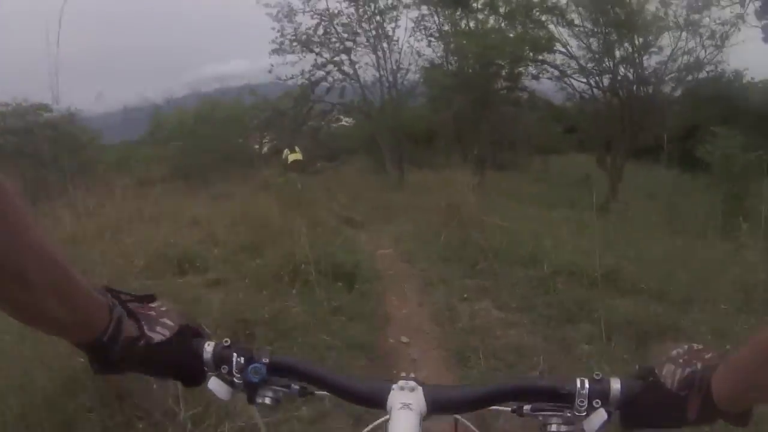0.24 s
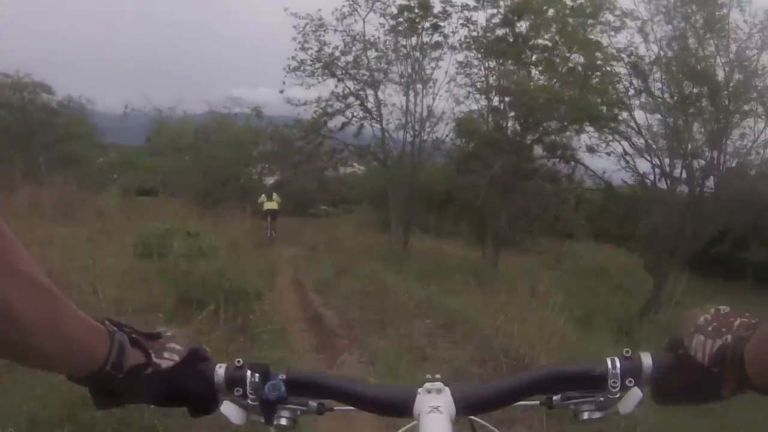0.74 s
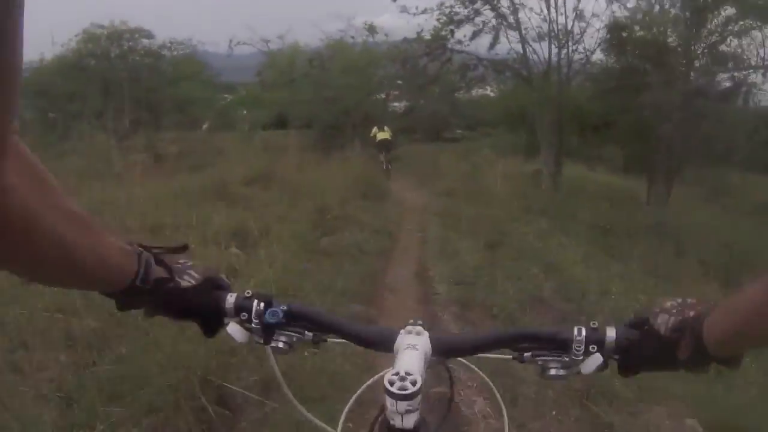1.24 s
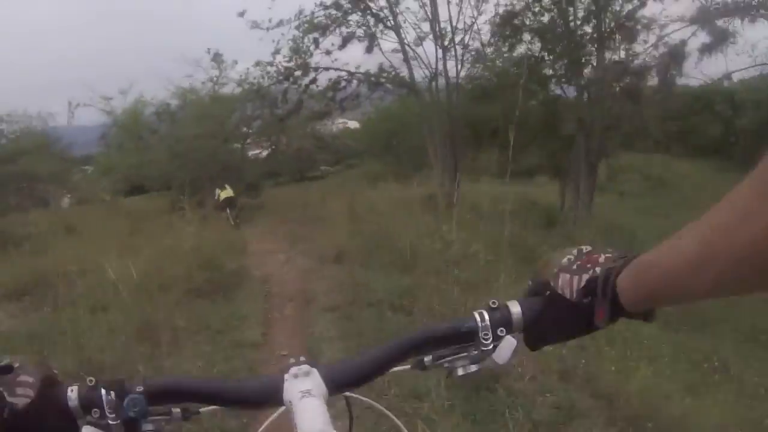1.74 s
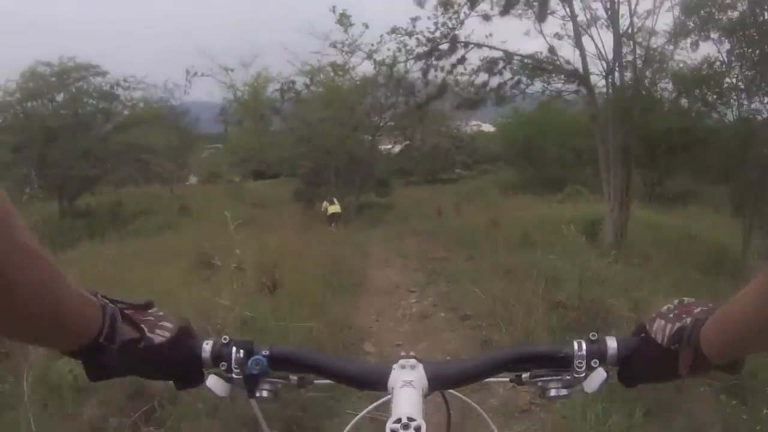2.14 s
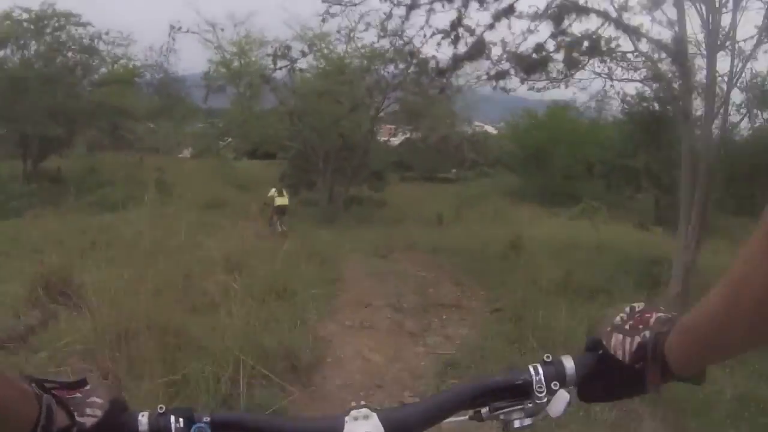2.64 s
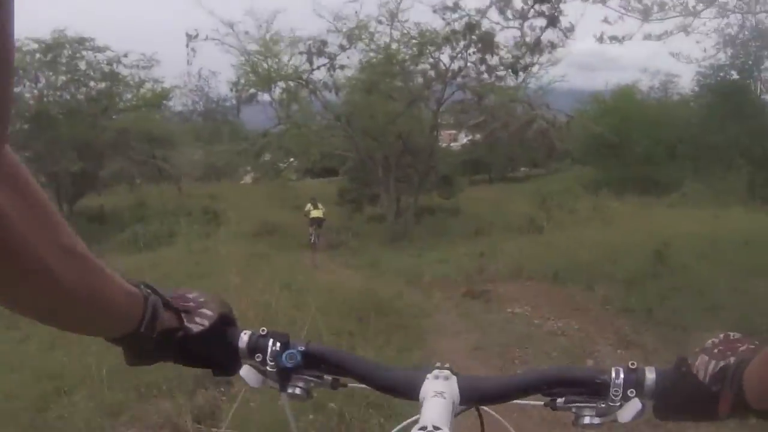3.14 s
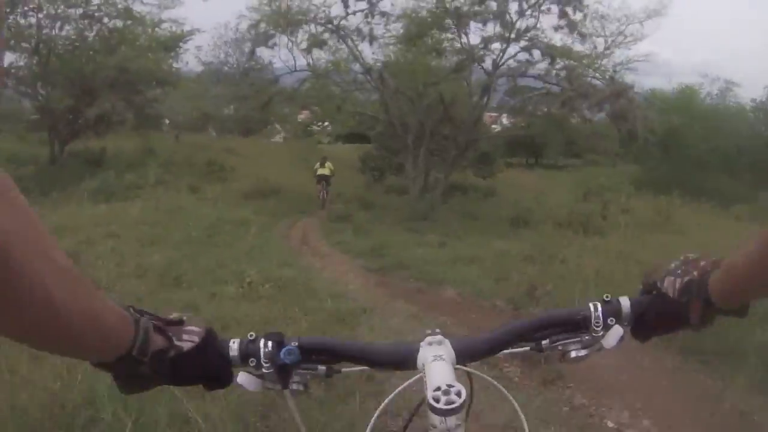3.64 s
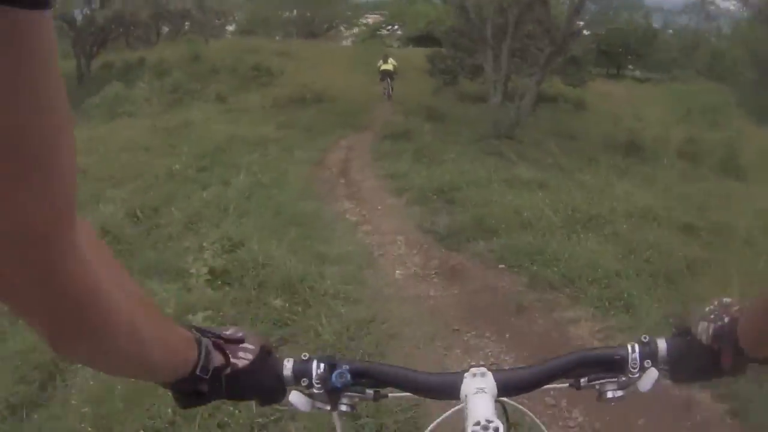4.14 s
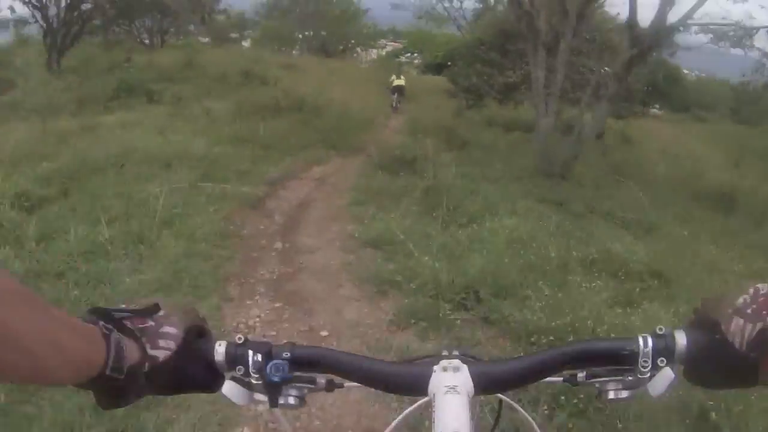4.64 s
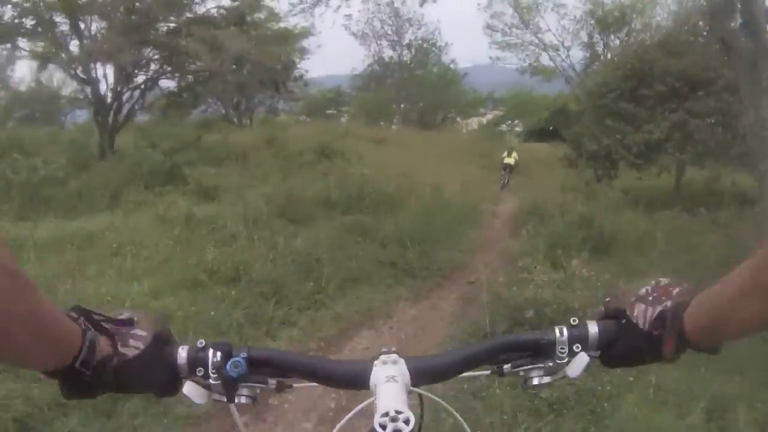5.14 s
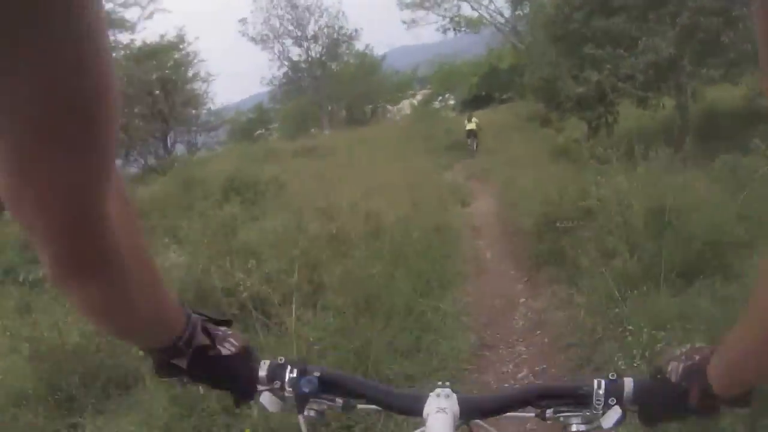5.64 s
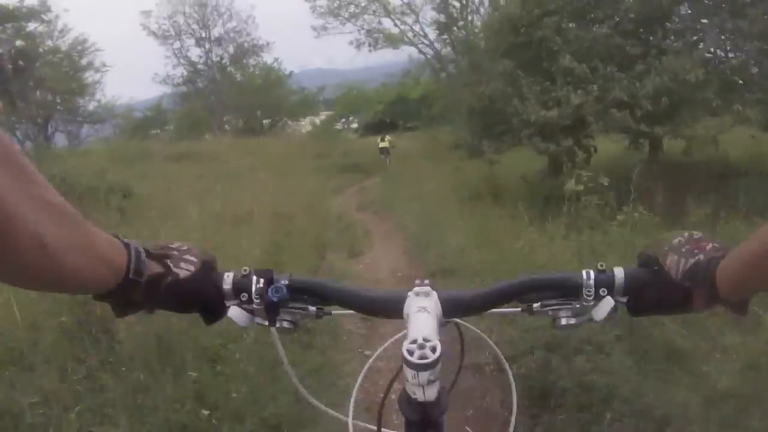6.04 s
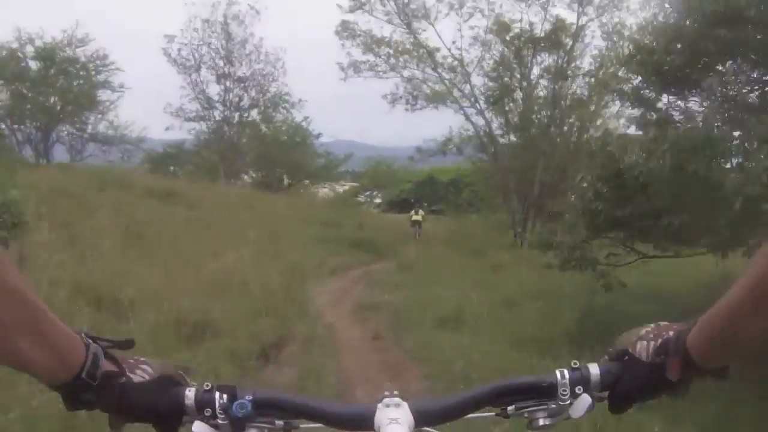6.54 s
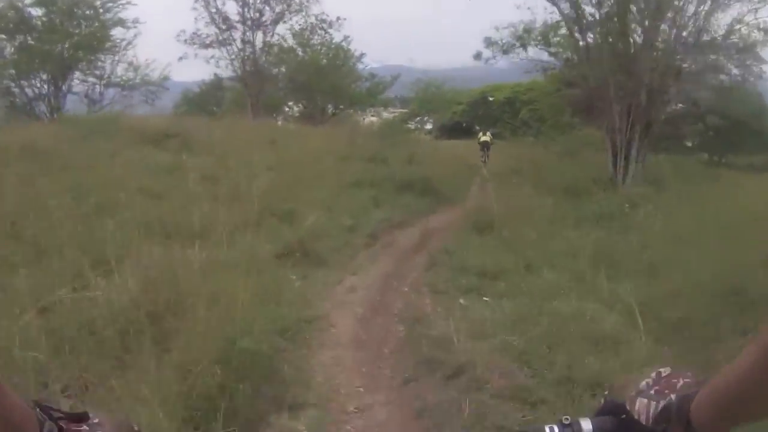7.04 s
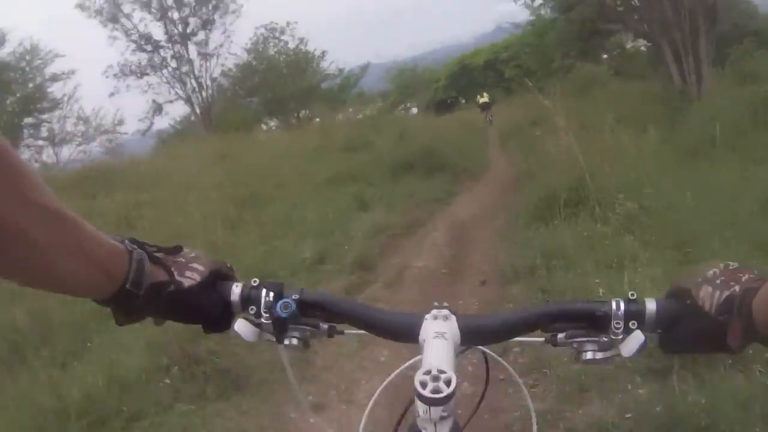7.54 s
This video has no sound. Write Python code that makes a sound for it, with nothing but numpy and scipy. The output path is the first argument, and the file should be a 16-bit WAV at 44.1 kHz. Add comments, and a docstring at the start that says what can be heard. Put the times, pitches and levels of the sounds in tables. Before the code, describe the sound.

Continuous rough riding on dirt and gravel, muffled and boxy, very close. The rider's body sways and bumps the plastic-cased microphone with very low heaves and damped thuds, while the case knocks in hollow mid tones. Fine tyre grit crunches and small parts tick. Tiny high chirps and a short scrape come early, hard knocks at 1.5 and 5.7 seconds, and metallic chain slaps ring later.

```python
"""A mountain bike on a bumpy dirt trail, heard by a camera in a closed plastic housing on the rider's chest.
From the start the body sways and thuds (low noise, damped swings), knocks and tyre grit ring the housing, parts tick.
Chain clinks on the frame (sharp modes) begin at 0.6 s; faint gliding chirps come at 1.0 to 1.4 s, then a scrape.
Hard knocks fall at 1.55 and 5.74 s, the fullest clinks at 4.75 and 5.86 s; the ride goes on to the end at 7.8 s.
Rumble, wind and microphone hiss (shaped noise) lie underneath throughout."""
import sys
import numpy as np
from scipy import signal
from scipy.fft import rfft, irfft
from scipy.io import wavfile
from scipy.ndimage import uniform_filter1d

SR = 44100
rng = np.random.default_rng(int(sys.argv[2]) if len(sys.argv) > 2 else 0)


def store_wav(level_fs):
    """Save 16-bit WAV to argv[1]."""
    pcm = np.round(np.clip(np.atleast_2d(level_fs), -1, 1) * 32767)
    wavfile.write(sys.argv[1], SR, pcm.T.astype(np.int16))


N = 343980
TIME_S = np.arange(N) / SR


def undb(db):
    """Decibels to gain."""
    return 10 ** (np.asarray(db) / 20)


def unit(x):
    """Scale to rms 1."""
    return x / np.sqrt(np.mean(x ** 2))


def band(x, lo_hz, hi_hz):
    """Band-pass."""
    return signal.sosfilt(signal.butter(N=2, Wn=[lo_hz, hi_hz], btype="band", fs=SR, output="sos"), x)


def noise(points):
    """Steady noise with a spectrum through (freq_hz, level_db) points, rms 1."""
    hz, db = np.transpose(points)
    log_hz = np.log(np.maximum(np.fft.rfftfreq(N, 1 / SR), 1))
    shape = undb(np.interp(log_hz, np.log(hz), db))
    return unit(irfft(rfft(rng.standard_normal(N)) * shape, N))


def flicker(rate, depth_db):
    """A gain that wanders at random: rate new levels a second, of spread depth_db before smoothing."""
    k = int(SR / rate)
    steps = np.repeat(rng.standard_normal(N // k + 1), k)
    smooth = uniform_filter1d(uniform_filter1d(steps, k), k)
    return undb(depth_db * smooth[:N])


def grit(rate, spread_db):
    """Dense random clicks, rate a second, a few much larger than the rest; rms 1."""
    chance = rng.random((N, 3)).T
    falls = chance[0] < rate / SR
    size = undb(-spread_db * np.log(1 - chance[2]))
    return unit(falls * np.sign(chance[1] - .5) * size)


def ring(x, hz, width):
    """One resonance of a given width in Hz; a unit impulse rings with amplitude 1."""
    r, w = np.exp(-np.pi * width / SR), 2 * np.pi * hz / SR
    return signal.lfilter([np.sin(w)], [1, -2 * r * np.cos(w), r * r], x)


def shaken(x, modes):
    """Modes (freq_hz, width_hz, level_db) all driven by x, each brought to its level."""
    return sum(undb(db) * unit(ring(x, hz, width)) for hz, width, db in modes)


def contacts(s, ms):
    """For each contact its samples and a burst of chatter that builds fast and decays over ms; unit energy."""
    t_ms = np.arange(SR // 25) * 1000 / SR
    shape = (1 - np.exp(-t_ms / .5)) * np.exp(-t_ms / np.clip(ms, .2, 12)[:, None])
    burst = rng.standard_normal(shape.shape) * shape
    where = np.minimum((s * SR).astype(int)[:, None] + np.arange(len(t_ms)), N - 1)
    return where, burst / np.sqrt(np.sum(burst ** 2, axis=1, keepdims=True))


def strike(where, burst, db):
    """Bursts laid out in time, each at its level."""
    return np.bincount(where.ravel(), (burst * undb(db)[:, None]).ravel(), N)


# the rider's body moving against the housing, before the random wander: time_s, level_db
BODY_LEVEL = [(0.0, -38.5), (0.39, -33.5), (1.3, -37), (1.56, -27), (1.78, -28.5), (1.93, -39), (2.17, -40),
              (2.63, -30.5), (2.82, -37.5), (4.36, -27.5), (5.54, -35), (5.67, -28.5), (6.36, -35.5),
              (7.8, -36.5)]
# spectrum of that movement: freq_hz, level_db (per Hz)
BODY_SPECTRUM = [(5, -10), (9, 15.5), (20, 18), (36, 8), (60, -2), (100, -64), (300, -110)]


def sway():
    """The body leans on the housing: very low noise, softly limited, its level following the ride."""
    press = unit(band(np.tanh(0.89 * noise(BODY_SPECTRUM)), 5.8, 80))
    return press * flicker(9, 1.6) * undb(np.interp(TIME_S, *np.transpose(BODY_LEVEL)))


# single heaves of the body over a bump: middle_s, level_db (before the envelope), pitch_hz
BODY_HEAVES = [(0.462, -26, 18), (0.914, -26.0, 25), (1.357, -15.5, 22), (1.517, -18, 33),
               (1.635, -20, 18.4), (1.789, -24, 23), (2.414, -19.5, 17), (2.691, -24, 25), (2.787, -17, 21),
               (3.015, -28, 22), (3.122, -25, 15), (3.336, -23.5, 25), (3.452, -24, 28), (3.528, -20, 25),
               (3.699, -20, 17), (3.778, -31, 32), (3.89, -24.5, 27), (4.001, -21.5, 26),
               (4.19, -15.0, 20.8), (4.33, -23, 28), (4.443, -20, 21), (4.55, -21.5, 21),
               (4.694, -17.5, 30), (4.784, -22.5, 21), (4.917, -24, 34), (5.197, -26, 18), (5.617, -17, 24),
               (5.735, -14, 21.6), (5.911, -20.5, 20), (6.03, -32.5, 20), (6.138, -30, 20.4),
               (6.827, -25.5, 20), (6.922, -22.5, 21), (7.295, -21.5, 24)]
HEAVE_CYCLES = .45  # half length, to 1/e
HEAVE_LEAN = .17  # cycles by which the inward swing comes before the middle


def heaves():
    """Each heave is one slow swing in and out again."""
    s, db, hz = np.transpose(BODY_HEAVES)[:, :, None]
    k = np.arange(-SR // 8, SR // 8)
    cycles = hz * k / SR
    where = np.clip((s * SR).astype(int) + k, 0, N - 1)
    swing = -np.cos(2 * np.pi * (cycles + HEAVE_LEAN)) * np.exp(-(cycles / HEAVE_CYCLES) ** 2)
    return strike(where, swing, db[:, 0])


# jolts that swing the housing on its strap: start_s, level_db (before the envelope), pitch_hz, rise_ms
STRAP_JOLTS = [(.315, -16.5, 108, 2.3), (.380, -20, 136, 0.92), (.453, -24.5, 140, 1.5),
               (.462, -21.5, 149, 3.3), (0.525, -13.5, 83, 2.9), (.738, -24.5, 103, 6.4),
               (1.118, -22, 60, 7), (1.365, -17, 124, 1.74), (1.494, -20, 70, 5), (1.549, -25, 149, 0.35),
               (1.563, -23, 120, 0.77), (1.611, -32, 108, 4.6), (1.709, -18, 117, 2.3), (1.79, -19, 131, 2),
               (1.885, -20.5, 115, 2.8), (2.239, -23, 109, 3.8), (2.302, -21.5, 163, 1.07),
               (2.424, -19.5, 143, 1.5), (2.601, -22, 137, 2.7), (2.809, -23.5, 64, 4.6),
               (3.001, -23, 59, 8.4), (3.34, -17, 146, 2.34), (3.545, -21.5, 143, 2.4),
               (3.65, -21.5, 69.4, 6), (3.876, -22.5, 93, 4), (4.391, -24, 151, 2),
               (4.443, -19.5, 158, 0.98), (4.466, -25, 160, 3.3), (4.513, -20, 154, 1.54),
               (4.543, -18.5, 109, 2.6), (4.566, -27.5, 140, 1.7), (4.602, -31, 110, 2.4),
               (4.659, -21, 107, 7.3), (4.848, -24, 160, .9), (4.913, -25.5, 120, 1),
               (4.973, -20.5, 145, 1.7), (5.048, -26, 141, 1.5), (5.133, -22, 142, 2.9),
               (5.61, -26, 60, 3.7), (5.745, -13.5, 122, 1.7), (5.781, -16.5, 111, 3.2),
               (5.91, -16, 133, 0.78), (5.957, -22.5, 152, 2.2), (6.214, -26, 103, 1.24),
               (6.353, -21.5, 99, 1.73), (6.915, -26, 154, 1.15), (7.084, -25.5, 70, 4.5),
               (7.309, -19.5, 190, 1), (7.414, -25, 142, 1.05), (7.475, -18, 156, 0.83)]
THUD_CYCLES, THUD_RISES = 2.67, 8.8  # a swing dies by 60 dB in so many cycles plus so many rise times


def thuds():
    """Low, heavily damped swings that start with a snap inwards and leave the strap shuddering."""
    s, db, hz, rise_ms = np.transpose(STRAP_JOLTS)[:, :, None]
    t60 = THUD_CYCLES / hz + THUD_RISES * rise_ms / 1000
    t = np.arange(SR // 5) / SR
    rise = 1000 * t / rise_ms
    push = np.exp(-np.log(1000) * t / np.maximum(t60, .01)) * (1 - np.exp(-rise ** 2))
    # the contact itself, short and strongest when hard
    snap = 0.31 * np.exp(-((rise - .9) / 0.5) ** 2) / rise_ms
    where = np.minimum((s * SR).astype(int) + np.arange(len(t)), N - 1)
    swings = strike(where, -np.cos(2 * np.pi * hz * t) * push - snap, db[:, 0])
    shudder_shape = np.exp(-t / 0.027) * (1 - np.exp(-t / 0.0044))
    shudder = strike(where, shudder_shape + 0 * s, db[:, 0] - 21.5)
    return swings + shudder * unit(band(grit(500, 3.93), 142, 245))


# camera against housing: start_s, level_db (before the mode levels), pitch_hz (favoured)
CAMERA_KNOCKS = [(0.1199, -25.5, 1400), (0.285, -23, 1160), (0.38, -24, 1630), (0.5556, -25.5, 2410),
                 (0.633, -30, 1420), (1.3648, -23, 1300), (1.55, -17, 1430), (1.5743, -25, 1420),
                 (1.713, -22, 1820), (1.79, -27.5, 1620), (1.8834, -31, 1170), (2.133, -26.5, 1520),
                 (2.3012, -28.5, 1460), (2.4233, -31, 1440), (2.596, -33, 1350), (2.6526, -32, 1490),
                 (2.727, -32, 1500), (2.781, -29, 1810), (2.8983, -28.5, 1730), (3.0124, -30.5, 1770),
                 (3.0778, -31.5, 1500), (3.3377, -25.5, 1500), (3.544, -29, 1730), (3.631, -39, 1890),
                 (3.75, -39, 2310), (3.79, -30.5, 1920), (4.1624, -28.5, 1870), (4.2455, -32, 1860),
                 (4.318, -36, 1920), (4.4396, -25.5, 1520), (4.7244, -26.5, 1820), (4.7507, -24.5, 1500),
                 (4.8213, -24, 1500), (4.8464, -23, 1160), (4.912, -26, 1300), (4.9722, -30, 1500),
                 (5.035, -31, 1820), (5.0496, -34, 1820), (5.0867, -26.5, 1840), (5.1366, -23.5, 1180),
                 (5.2075, -31, 1840), (5.4358, -28.5, 1500), (5.5418, -27.5, 1430), (5.686, -30, 1600),
                 (5.7412, -18, 1450), (5.8579, -23, 1510), (5.9102, -25.5, 1720), (5.951, -21.5, 1570),
                 (6.171, -33, 1570), (6.188, -32, 1870), (6.2156, -48, 1530), (6.238, -32, 1180),
                 (6.354, -32, 1470), (6.4094, -32, 1820), (6.7257, -27, 1530), (7.309, -25, 1320),
                 (7.473, -29, 1450), (7.5431, -24, 1860)]
# resonances of the air space in the housing: freq_hz, width_hz, level_db (relative)
CAVITY_MODES = [(1180, 89, -9), (1500, 188, 0.5), (1820, 141, -3.5), (2310, 170, -4)]


def knocks():
    """Each knock rings the cavity, most near its own pitch, beside the bare click of contact."""
    s, db, pitch_hz = np.transpose(CAMERA_KNOCKS)
    where, burst = contacts(s, 2.3 + 0 * s)
    cavity = 0
    for hz, width, mode_db in CAVITY_MODES:
        off_pitch_db = -14 * np.abs(np.log2(hz / pitch_hz))  # 14 dB an octave
        cavity += ring(strike(where, burst, db + mode_db + off_pitch_db), hz, width)
    click = strike(*contacts(s, 0.81 + 0 * s), db - 10)
    return band(cavity, 1224, 2480) + band(click, 400, 3600)


# short crunches of gravel that swell the grit: middle_s, half_length_ms (to 1/e), rise_db (over the grit)
GRAVEL_CRUNCHES = [(0.114, 6.4, 10), (.183, 7, 3), (0.291, 12, 6), (.335, 18, 2.5), (.465, 32, 6.5),
                   (0.526, 5.1, 10), (1.47, 20, 2), (1.53, 15, 5.5), (1.64, 16, 2.5), (3.02, 19, 5.5),
                   (3.59, 16, 3.5), (3.64, 18, 3.5), (4.135, 9.1, 6), (4.33, 15, 4), (4.5, 23, 6),
                   (4.555, 7.3, 8), (4.725, 13, 8.5), (4.83, 12, 2.5), (5.77, 20, 5), (6.0, 15, 1),
                   (6.8, 25, 4.5), (7.327, 17, 6.5), (7.46, 12, 2), (5.69, 4.5, 5), (7.67, 25, 1.5)]
JOLT_S, JOLT_DB = 0.032, 2.5  # decay time and, for the hardest knock, size of the grit stirred up


def stirred():
    """Extra dB of grit: every knock leaves some behind, more if hard, and crunches swell and sink."""
    s, db, _ = np.transpose(CAMERA_KNOCKS)[:, :, None]
    decay = (TIME_S > s) * np.exp(-np.abs(TIME_S - s) / JOLT_S)
    after = JOLT_DB * np.sqrt(undb(db - db.max())) * decay
    s, half_ms, db = np.transpose(GRAVEL_CRUNCHES)[:, :, None]
    swell = db * np.exp(-(1000 * (TIME_S - s) / half_ms) ** 2)
    return np.sum(after, axis=0) + np.sum(swell, axis=0)


# how rough the trail is, as three base levels: time_s, rumble_db, grit_db, treble_db
TRAIL = [(0.0, -50.5, -48.5, -61), (0.41, -49, -47.5, -63.5), (0.71, -53, -54, -64.5),
         (1.21, -54, -53, -65), (1.61, -41.5, -45, -60), (1.95, -50.5, -52.5, -66), (2.65, -50, -50, -63),
         (3.1, -50, -51.5, -63.5), (3.45, -44, -51.5, -63), (3.67, -46.5, -47.5, -60),
         (4.02, -49, -51, -62), (4.52, -45.5, -47, -60.5), (4.95, -48, -46.5, -59), (5.24, -51.5, -51, -62),
         (5.56, -48.5, -50.5, -63.5), (5.91, -43.5, -43, -55), (6.39, -47, -49.5, -63),
         (7.23, -47, -49, -63), (7.49, -46.5, -43, -60.5), (7.8, -48.5, -47.5, -64.5)]


def trail_db(column, at_s):
    """Level of one trail layer at given times; column 1 is rumble, 2 tyre grit, 3 treble."""
    return np.interp(at_s, *np.transpose(TRAIL)[[0, column]])


# tones of the plastic shell: freq_hz, width_hz, level_db (relative)
SHELL_MODES = [(3187, 115, -9), (3910, 480, -4.5), (4954, 124, -6.5), (6100, 980, -1)]
# broad bright resonances above the shell's: freq_hz, width_hz, level_db (relative)
BRIGHT_MODES = [(7660, 1700, -4.5), (9120, 1080, -3), (11100, 2000, -16), (13200, 2800, -26)]
# spectrum of the gravel's hiss: freq_hz, level_db (per Hz)
GRAVEL_HISS = [(800, -60), (2000, -11), (2800, 8.5), (4500, 2), (7000, -1), (11300, -5.5), (15000, -16.5)]


def tyres():
    """Gravel under the tyres shakes the housing: crunches in the cavity, shell tones, fine ticks and a hiss."""
    crunch = flicker(60, 2.37)
    cavity = sum(undb(db) * flicker(40, 2.7) * unit(ring(grit(1800, 2.22), hz, width))
                 for hz, width, db in CAVITY_MODES)
    shell = sum(undb(db) * flicker(23, 3.2) * unit(ring(grit(900, 1.56), hz, width))
                for hz, width, db in SHELL_MODES)
    # every fine tick chatters for a few milliseconds
    fine = ring(np.abs(grit(34, 0.68)), 57, 150) * rng.standard_normal(N)
    bright = shaken(fine, BRIGHT_MODES)
    treble = unit(band(shell, 1700, 5140) * crunch) * undb(-2.5)
    treble += unit(band(bright, 4000, 20000)) * undb(-17)
    treble += noise(GRAVEL_HISS) * flicker(4.7, 0.67) * undb(-6.5)
    clatter = unit(band(grit(700, 2.8), 364, 1040) * crunch)  # low clatter of the housing
    body = unit(band(cavity, 976, 2790) * crunch) + undb(-12) * clatter
    stir_db = stirred()
    body_gain = undb(trail_db(2, TIME_S) + stir_db)
    treble_gain = undb(trail_db(3, TIME_S) + 0.93 * stir_db)
    return body * body_gain + treble * treble_gain


# chain on frame, levels before the offsets below: start_s, crack_db, bright_db,
# ring_db of the four groups of frame modes from low to high, contact_ms (decay)
CHAIN_CLINKS = [(0.5576, -35, -47, -62, -58, -55, -51, 1.3), (1.5503, -33, -69, -49, -57, -56, -64, 2.7),
                (4.1755, -29.5, -35, -36, -45, -37, -49, 2.4),
                (4.7502, -25, -29.5, -32.5, -39, -40, -33, 3.2), (5.087, -35, -55, -58, -41, -41, -46, 2.4),
                (5.8576, -29, -31.5, -22.5, -41, -45, -32, 3.7),
                (5.9522, -29.5, -33, -31.5, -41, -32.5, -35, 1.2),
                (7.437, -33.5, -43, -43, -58, -52, -48, 1.5), (7.5439, -42, -31.5, -50, -46, -53, -51, 1.6)]
# modes of the metal frame: freq_hz, level_db (relative in its group), decay_s (nominal, shortened below)
FRAME_MODES = [(3860, 0, 0.037), (4199, -15, 0.059), (4603, -22, 0.059), (5405, -20, 0.052),
               (6514, -15, 0.051), (7542, -22, 0.031), (9232, -26, 0.048), (10490, -19, 0.022),
               (11490, -33, 0.035), (12100, -37, 0.032), (12880, -26, 0.029), (14240, -41, 0.046)]
# borders between the four groups: freq_hz
GROUP_BORDERS = [4400, 6000, 7000]


def clinks():
    """The chain slaps the metal frame: sharp modes over a short crack, with new phases each time."""
    s, crack_db, bright_db, *ring_db, ms = np.transpose(CHAIN_CLINKS)
    where, burst = contacts(s, ms)
    out = sum(ring(strike(where, burst, bright_db + 8.5 + db), hz, width) for hz, width, db in BRIGHT_MODES)
    # the shell is damped to twice its width here
    out += sum(ring(strike(where, burst, crack_db + db), hz, 2 * width) for hz, width, db in SHELL_MODES)
    t = np.arange(where.shape[1]) / SR
    rattle = rng.standard_normal(where.shape) * np.exp(-t / 0.0078)  # the links jangle on for a moment
    out += band(strike(where, rattle, crack_db + 0.5), 3630, 4550)
    feed = np.exp(-1000 * t / ms[:, None])
    feed = 2 * feed / np.sum(feed, axis=1, keepdims=True)
    for hz, db, decay_s in FRAME_MODES:
        group = np.searchsorted(GROUP_BORDERS, hz)
        loudest_db = max(m[1] for m in FRAME_MODES if np.searchsorted(GROUP_BORDERS, m[0]) == group)
        # the chatter feeds each mode at its own pitch while the contact dies away
        drive = feed * np.sin(2 * np.pi * (hz * t + rng.random((len(s), 1))))
        level_db = ring_db[group] + db - loudest_db + 7.5 - 2.7 * min(group, 2)
        width = (3.05 + 2.0 * (group % 2)) / decay_s  # the second and top groups die faster
        out += ring(strike(where, drive, level_db), hz, width)
    return band(out, 2800, 16400)


# the clearest ticks of small loose parts, levels before the offsets below: start_s, shell_db, bright_db
PART_TICKS = [(0.028, -44, -53), (0.2904, -45, -68), (1.1543, -49, -52), (1.1664, -41, -53),
              (1.5793, -39, -52), (1.6097, -45, -48.5), (1.6576, -39, -57), (1.6801, -37, -63),
              (1.7554, -37, -69), (1.882, -44, -50), (2.1331, -37.5, -78), (2.2613, -40.5, -60),
              (2.2852, -40, -66), (2.3324, -37.5, -65), (2.406, -39, -49), (2.5557, -41, -50),
              (2.836, -42, -69), (2.87, -45, -68), (2.9003, -34.5, -59), (2.9084, -54, -50),
              (3.0114, -44, -53), (3.029, -39, -51), (3.0754, -39, -52), (3.1497, -39, -61),
              (3.3037, -38.5, -43.5), (3.49, -42, -66), (3.5019, -34.5, -61), (3.5145, -43, -47),
              (3.5355, -37, -50), (3.5673, -34, -60), (3.5834, -47, -48), (3.609, -41, -55),
              (3.6285, -43, -43), (3.647, -41, -53), (3.7484, -34, -73), (3.9719, -40.5, -57),
              (4.0337, -48, -52), (4.1374, -44, -56), (4.164, -43, -50), (4.2203, -33.5, -59),
              (4.243, -45, -42), (4.286, -35.5, -56), (4.318, -38, -47), (4.387, -46, -53),
              (4.4712, -33.5, -57), (4.4814, -36, -53), (4.571, -45, -48.5), (4.6683, -38.5, -52),
              (4.7945, -37, -50), (4.9472, -35, -52), (4.9881, -39, -56), (5.011, -49, -51),
              (5.0334, -34, -62), (5.0464, -42, -55), (5.0744, -42, -46), (5.1317, -40, -55),
              (5.15, -39, -51), (5.208, -38, -66), (5.2796, -36.5, -54), (5.356, -38, -66),
              (5.3837, -37, -58), (5.433, -37.5, -55), (5.683, -39, -62), (5.7214, -41.5, -61),
              (5.7396, -37, -57), (5.759, -47, -48), (5.8067, -34, -45), (5.9894, -41, -52),
              (6.0556, -36, -67), (6.0876, -34, -51), (6.1693, -36, -50), (6.1894, -41, -64),
              (6.2557, -44, -54), (6.351, -40, -55), (6.424, -36.5, -57), (6.4822, -41, -65),
              (6.6717, -38.5, -63), (6.8344, -38, -69), (7.1881, -54, -56), (7.2599, -42, -59),
              (7.429, -36, -55), (7.531, -41, -54), (5.929, -46, -60), (5.6077, -42, -62),
              (4.4084, -43, -62), (2.796, -56, -58), (7.4944, -35, -64), (7.558, -30, -44),
              (7.6034, -49, -52)]
FAINT_TICKS = 45
# the loudest faint tick over the trail's treble, and how far the others fall below it
FAINT_SHELL_DB, FAINT_BRIGHT_DB, FAINT_SPREAD_DB = 22, 3, 6


def ticks():
    """Light contacts ring the housing's shell, each with its own mix of modes; faint ones fall anywhere."""
    chance = rng.random((FAINT_TICKS, 3)).T
    at_s = chance[0] * N / SR
    treble_db = trail_db(3, at_s)
    scatter_db = -FAINT_SPREAD_DB * chance[1:]
    faint = [at_s, treble_db + FAINT_SHELL_DB + scatter_db[0], treble_db + FAINT_BRIGHT_DB + scatter_db[1]]
    s, shell_db, bright_db = np.hstack([np.transpose(PART_TICKS), faint])
    where, burst = contacts(s, 3.9 + 0 * s)
    modes = SHELL_MODES + BRIGHT_MODES
    mix_db = 2.5 * rng.standard_normal((len(s), len(modes))).T
    levels = [shell_db - 3] * len(SHELL_MODES) + [bright_db + 10] * len(BRIGHT_MODES)
    rings = sum(ring(strike(where, burst, level + mix + mode_db), hz, width)
                for (hz, width, mode_db), level, mix in zip(modes, levels, mix_db))
    return band(rings, 2300, 19500)


# resonances of the strap: freq_hz, width_hz, level_db (relative)
STRAP_MODES = [(800, 150, -13), (1160, 67, -12), (1340, 63, 11.5), (1690, 180, 1.5), (2270, 230, 7.5)]
SCRAPE_PEAK_S, SCRAPE_DB, SCRAPE_RISE_S, SCRAPE_FALL_S = 1.394, -26, 0.016, 0.009


def scrape():
    """Stick and slip: dense chatter rings strap and shell."""
    t = TIME_S - SCRAPE_PEAK_S
    drag = undb(SCRAPE_DB) * np.exp(-(t / np.where(t < 0, SCRAPE_RISE_S, SCRAPE_FALL_S)) ** 2 / 2)
    chatter = grit(4300, 0.58)
    strap = band(shaken(chatter, STRAP_MODES), 740, 2600)
    shell = band(shaken(chatter, SHELL_MODES), 3700, 5300)
    return drag * (unit(strap) + undb(-23) * unit(shell))


# spectrum of the trail's rumble: freq_hz, level_db (per Hz)
RUMBLE_SPECTRUM = [(10, -70), (40, -45), (65, 0), (130, -3.5), (250, -13.5), (640, -29), (1100, -32),
                   (2000, -35), (5000, -100)]


def rumble():
    """The rough trail as low noise with a restless level."""
    return noise(RUMBLE_SPECTRUM) * flicker(15, 4.0) * undb(trail_db(1, TIME_S))


# spectrum of the wind: freq_hz, level_db (per Hz)
WIND_SPECTRUM = [(100, -34), (300, 6.5), (600, 8), (1000, -14.5), (2500, -27), (6000, -66)]


def wind():
    """Wind as faint noise, slowly wandering in level."""
    return noise(WIND_SPECTRUM) * flicker(5.3, 1.5) * undb(-68.5)


# faint high chirps, perhaps an insect in the grass:
# start_s, length_s, pitch_hz (at the start), glide_hz_per_s, level_db (rms, before the fade)
GRASS_CHIRPS = [(0.966, .048, 11340, 6000, -71), (1.103, .067, 11380, -900, -66.5),
                (1.347, .017, 11300, 0, -66)]
CHIRP_ATTACK_S, CHIRP_FADE_DB_PER_S = .007, 120


def chirps():
    """Thin gliding tones that fade."""
    out = 0
    for s, length, hz, glide, db in GRASS_CHIRPS:
        t = TIME_S - s
        ends = np.clip(np.minimum(t, length - t) / CHIRP_ATTACK_S, 0, 1)
        fade = ends * undb(db - CHIRP_FADE_DB_PER_S * np.maximum(t, 0))
        out += fade * np.sqrt(2) * np.sin(2 * np.pi * (hz * t + glide * t ** 2 / 2))
    return out


def scene():
    """All sources add up at the one microphone inside the housing."""
    body = sway() + heaves() + thuds()
    housing = knocks() + tyres() + clinks() + ticks() + scrape()
    background = rumble() + wind() + chirps()
    return (body + housing + background)[None]


# spectrum of the microphone's own hiss: freq_hz, level_db (per Hz)
MIC_SPECTRUM = [(1500, -38), (4000, -2), (9000, -7), (15000, -12)]
PORT_HZ, TOP_HZ = 11300, 15250


def record(dry):
    """The microphone port dulls the top octave, the microphone hisses, the recorder cuts what is left."""
    port = signal.sosfilt(signal.butter(N=2, Wn=PORT_HZ, fs=SR, output="sos"), dry)
    heard = port + noise(MIC_SPECTRUM) * undb(-73)
    return signal.sosfilt(signal.ellip(10, .2, 80, TOP_HZ, fs=SR, output="sos"), heard)


dry = scene()
out = record(dry)
store_wav(out)
```